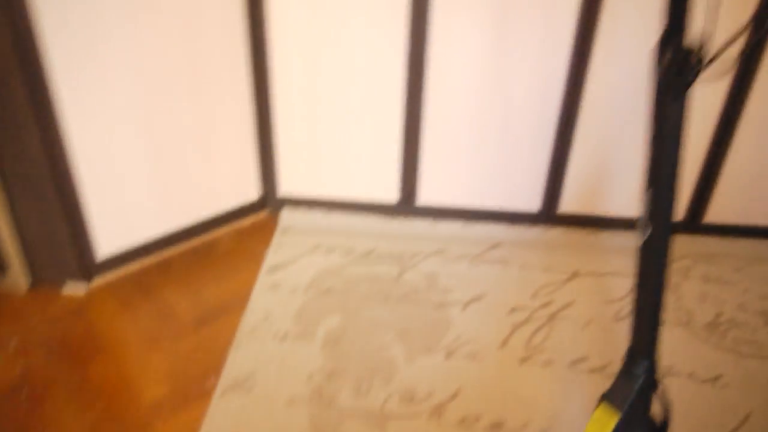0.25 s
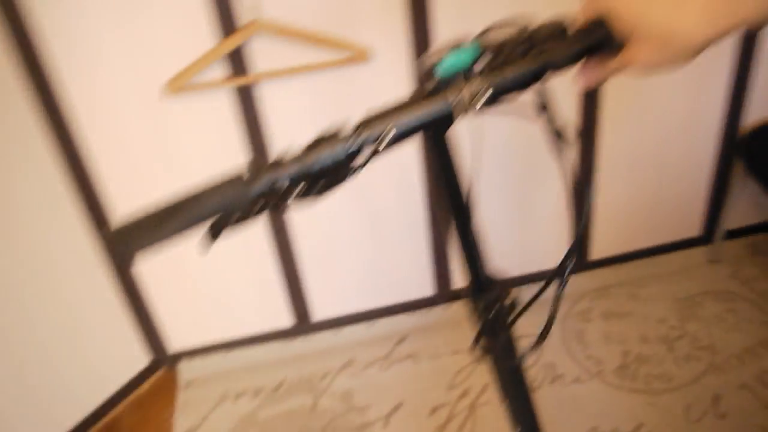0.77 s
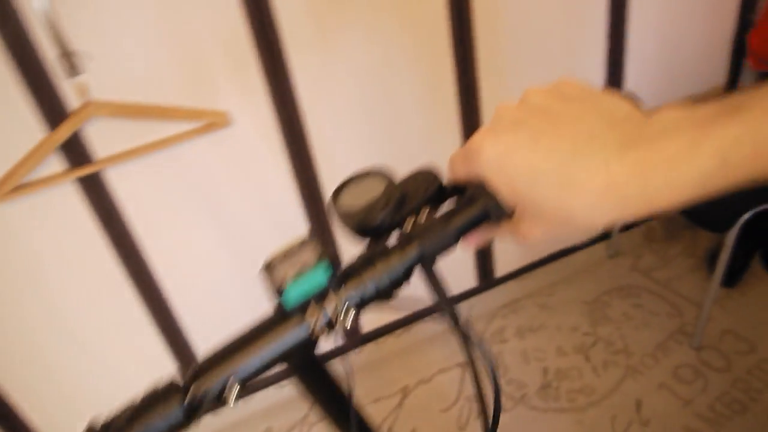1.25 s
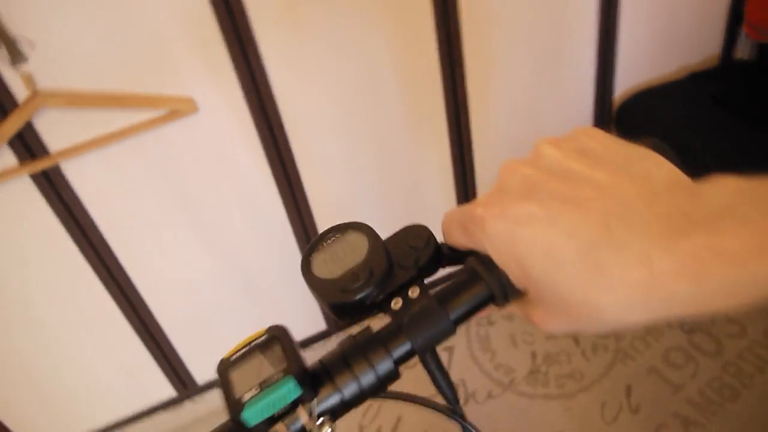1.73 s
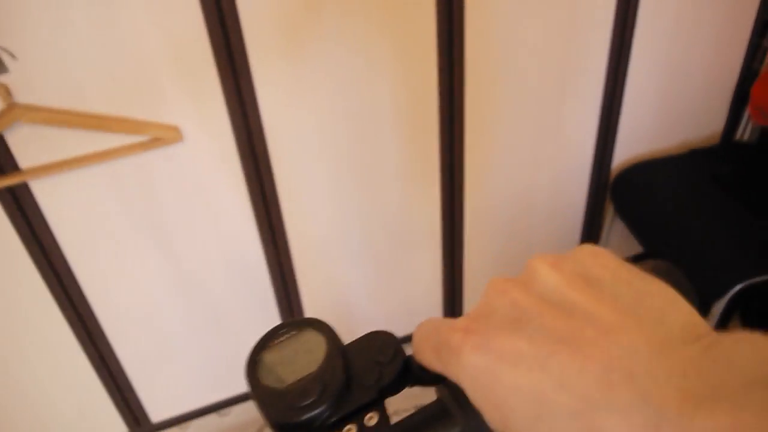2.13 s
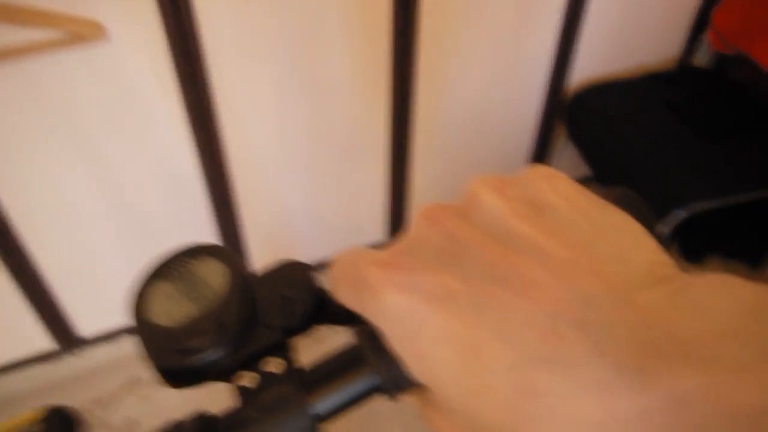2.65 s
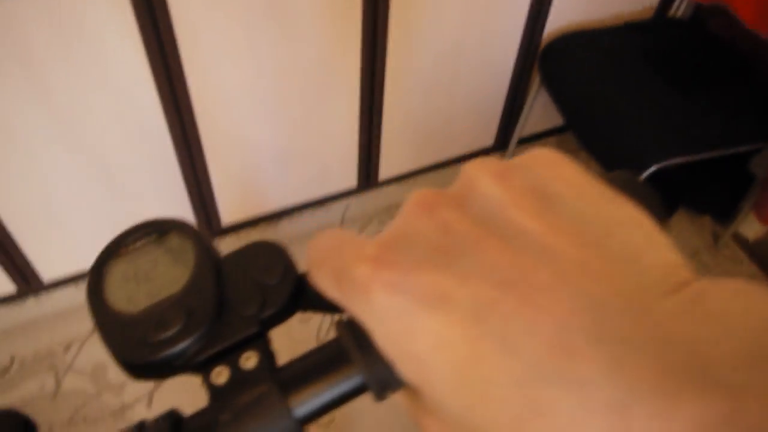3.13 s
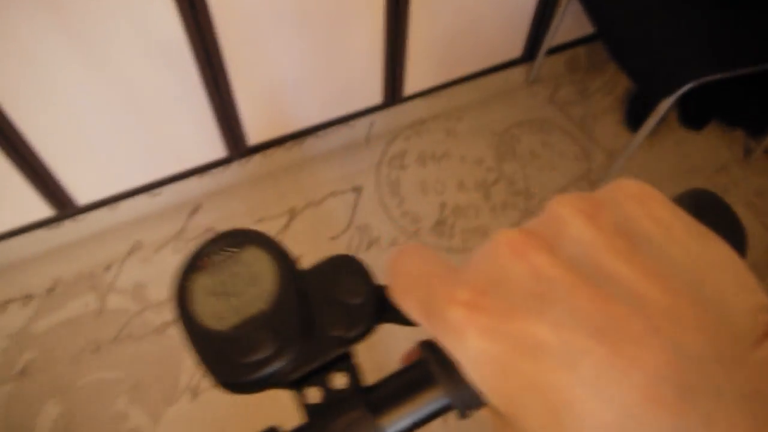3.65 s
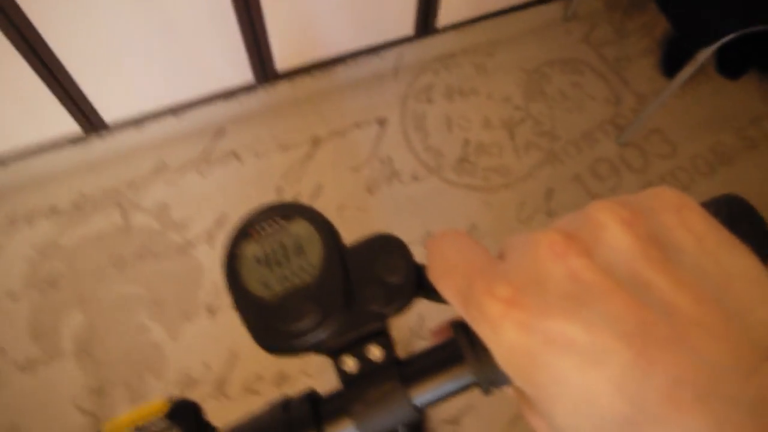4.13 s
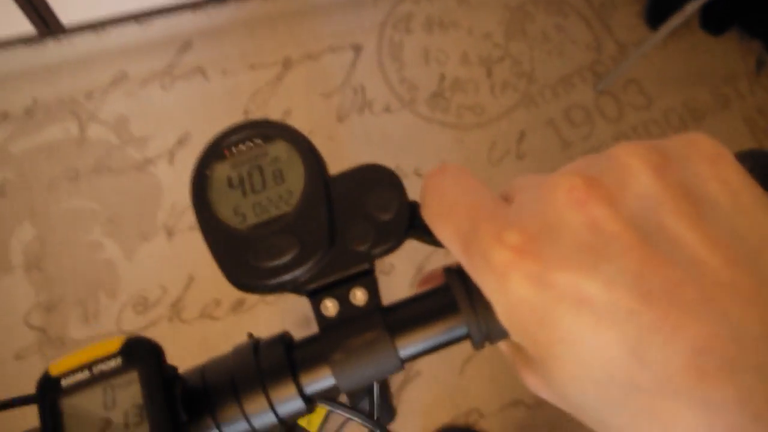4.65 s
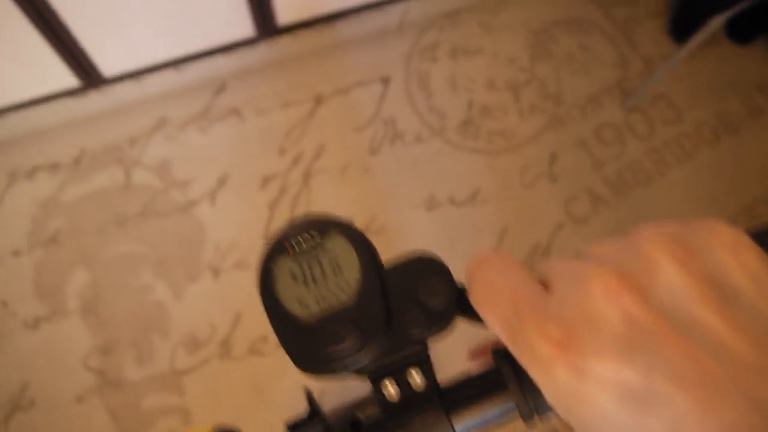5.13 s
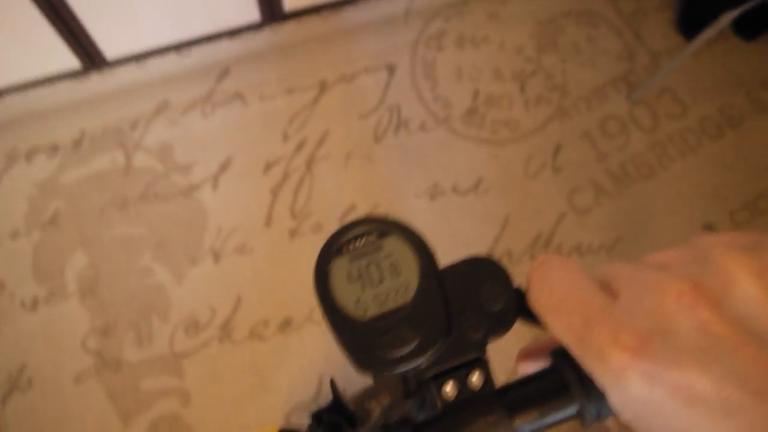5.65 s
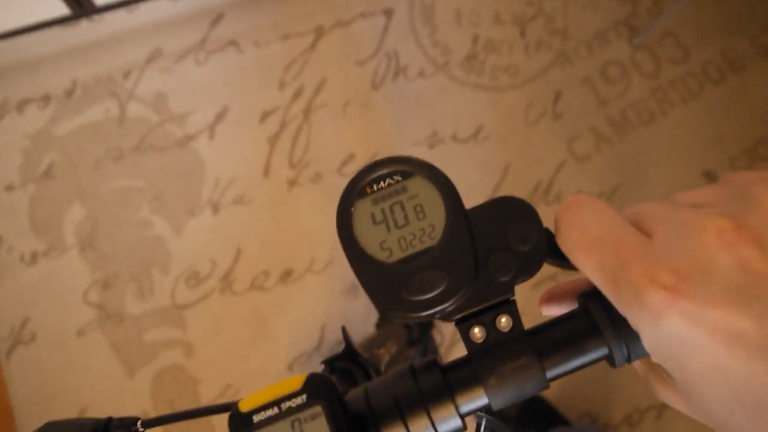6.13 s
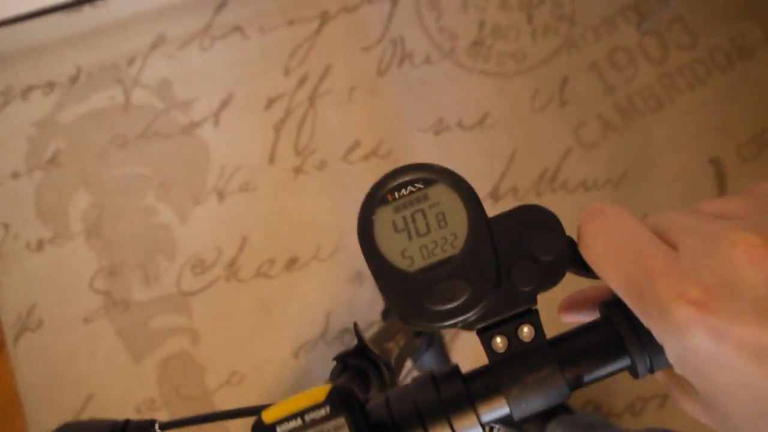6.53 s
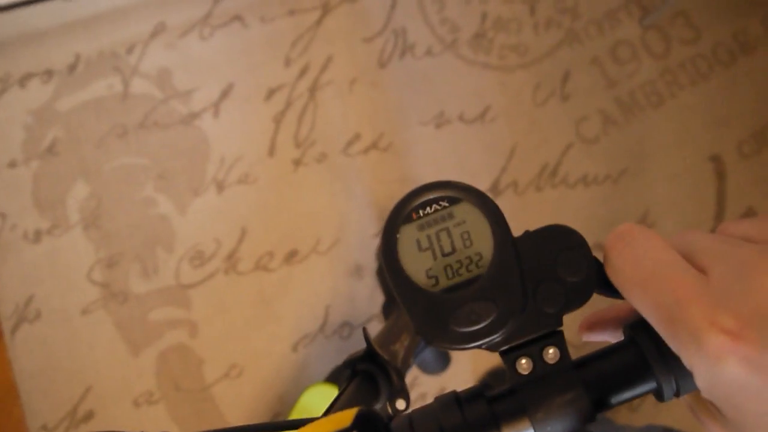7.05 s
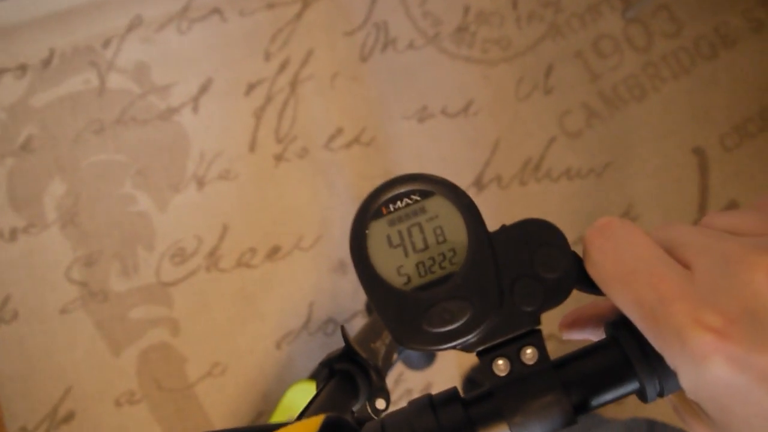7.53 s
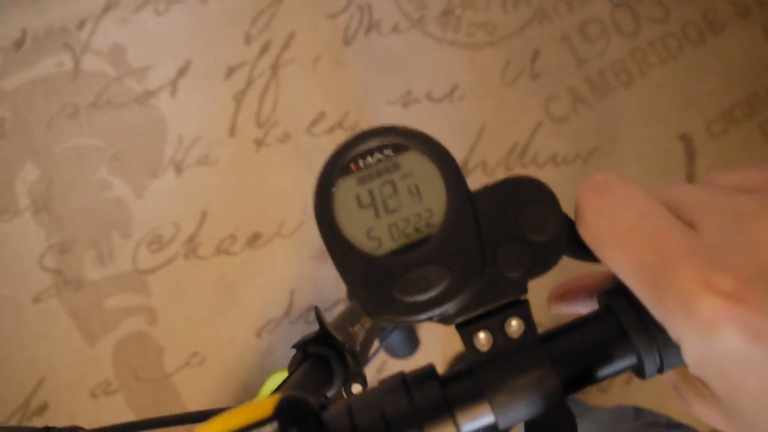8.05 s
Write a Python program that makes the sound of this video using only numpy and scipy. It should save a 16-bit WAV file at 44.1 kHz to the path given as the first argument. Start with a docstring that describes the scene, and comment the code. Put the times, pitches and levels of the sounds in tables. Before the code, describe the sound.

A small electric hub motor spins freely indoors, a steady mid-low hum fluttering rapidly under a thin, piercing treble whine and airy bearing rush.

```python
"""Free-spinning hub motor in a small room

The hub motor of a scooter spins free at full speed; a hand-held camera swings from wheel to handlebar.
Slots and magnets hum on multiples of the wheel's turn; the controller's switching whines in the treble.
Bearings and air rush through the hub's resonances, with thin tones of their own.
Early on cloth rustles and something scuffs near the camera's two microphones.
"""
import sys
import numpy as np
from scipy import signal
from scipy.fft import rfft, irfft, next_fast_len
from scipy.io import wavfile
from scipy.ndimage import uniform_filter1d

SR = 44100
rng = np.random.default_rng(int(sys.argv[2]) if len(sys.argv) > 2 else 0)


def waveform_to_disk(signal):
    """Save audio, clipped to [-1, 1], as 16-bit WAV at the path in sys.argv[1]."""
    frames = np.transpose(np.atleast_2d(signal))
    scaled = np.clip(frames, -1, 1) * 32767
    samples = np.round(scaled).astype(np.int16)
    wavfile.write(sys.argv[1], SR, samples)


N = 365588
TIME_S = np.arange(N) / SR
TURN_HZ = 13.8428  # turns of the wheel a second


def undb(db):
    """Gain of a level in dB."""
    return 10 ** (np.asarray(db) / 20)


def curves(table):
    """Columns of a (time [s], value, ..) table, joined by straight lines, one value a sample."""
    time_s, *columns = np.transpose(table)
    return [np.interp(TIME_S, time_s, column) for column in columns]


def walk(rate):
    """Random wander about zero, rate knots a second, joined smoothly; spread near 1."""
    step = int(SR / rate)
    knots = rng.standard_normal(N // step + 2)
    joined = np.interp(np.arange(N) / step, np.arange(len(knots)), knots)
    return 1.37 * uniform_filter1d(joined, step // 2)


def noise(gain):
    """Noise whose spectrum follows gain(Hz)."""
    size = next_fast_len(N)
    hz = np.arange(size // 2 + 1) * SR / size
    spectrum = rfft(rng.standard_normal(size)) * gain(hz + 1e-3)  # the offset avoids 0 Hz
    return irfft(spectrum, size)[:N]


def band(hz, width_hz):
    """Noise in one broad resonance, rms 1."""
    x = noise(lambda f: 1 / (1 + ((f - hz ** 2 / f) / width_hz) ** 2))
    return x / np.std(x)


def swell(start_s, length_s, rise):
    """An arch from nothing up to 1 and back; rise under 1 is quick to rise, slow to fade."""
    progress = np.clip((TIME_S - start_s) / length_s, 0, 1)
    return np.sin(np.pi * progress ** rise) ** 2


def tone(hz, db, waver_db=0., rate=1., start=None):
    """A sine of rms level db; given a waver, the changing path through the room shifts its strength and phase."""
    if start is None:
        start = rng.uniform(0, 2 * np.pi) + waver_db / 4 * walk(rate)
    strength = np.sqrt(2) * undb(db + waver_db * walk(rate))
    return strength * np.cos(2 * np.pi * hz * TIME_S + start)


# how fast the camera swings through the room's echo pattern:
# (time [s], fades [1/s], echo share of the power [0-1])
SWING = [(0, 60, .8), (.45, 50, 0.76), (1.0, 25, 0.86), (1.8, 23.4, 0), (8.29, 29.6, 0.02)]


def fading(hz):
    """A tone of rms near 1: direct sound plus echoes whose sum turns over as the camera swings."""
    rate, share = curves(SWING)
    travel = np.cumsum(rate) / SR
    share = np.clip(share, 0, 1)
    knots = rng.standard_normal((1000, 2)) @ [1, 1j] / np.sqrt(2)
    echoes = np.interp(travel, np.arange(len(knots)), knots)
    path = np.sqrt(1 - share) + np.sqrt(share) * echoes
    return np.sqrt(2) * np.real(path * np.exp(2j * np.pi * hz * TIME_S))


REPEAT = 0.46  # share of the pattern that returns one turn later


def echo_of_turn(hz, from_hz=0.):
    """Response of a pattern that partly repeats with every turn above from_hz; mean power 1."""
    share = REPEAT / (1 + (from_hz / hz) ** 4)
    return np.sqrt(1 - share ** 2) / (1 - share * np.exp(-2j * np.pi * hz / TURN_HZ))


# cloth close to the camera while it swings, level of the upper band at the arch's peak:
# (start [s], length [s], level [dB])
RUSTLES = [(.08, .66, -57.5), (.5, .66, -54.5)]


def cloth():
    """Cloth rubbing: two broad bands of noise, made grainy by fast random changes of level."""
    fabric = band(8500, 6000) + undb(-5.5) * band(4300, 2200.)
    rub = sum(undb(db) * swell(start_s, length_s, rise=.75) for start_s, length_s, db in RUSTLES)
    grain = undb(0.75 * walk(29.2) + 0.81 * walk(400.))
    return rub * grain * fabric


# scuffs and knocks near the camera, level at the arch's peak before graininess:
# (start [s], length [s], level [dB], centre [Hz], width [Hz])
HANDLING = [(0.122, 0.056, -46, 150, 100), (0.123, 0.081, -39.5, 684, 600), (0.229, 0.076, -43, 180, 80),
            (0.37, 0.14, -30, 810, 980), (1.254, .025, -60, 5000, 5000), (3.32, .012, -58.5, 5500, 3000)]


def handling():
    """Grainy scuffs and soft knocks near the camera: short arches of noise in one resonance each."""
    out = np.zeros(N)
    for start_s, length_s, db, hz, width_hz in HANDLING:
        grainy = undb(db + 2. * walk(300.))
        out = out + grainy * swell(start_s, length_s, rise=.7) * band(hz, width_hz)
    return out


# rush of bearings and air, before the resonances: (frequency [Hz], level [dB per Hz])
RUSH = [(15, -71.5), (40, -73), (120, -81), (300, -78), (900, -76.5), (2000, -88.5), (3200, -94.5),
        (5000, -101), (8000, -104), (11300, -105), (14350, -102), (14600, -114), (15600, -125)]
# hub and frame resonances that lift the rush: (centre [Hz], width [Hz], lift [dB])
HUB = [(364, 91, 9.5), (596, 55, 1), (860, 67, 1.5), (1250, 74, 10), (1633, 145, 7), (2430, 250, 3),
       (2706, 390, 9), (9400, 560, 9)]
# treble resonances of the casing: (centre [Hz], width [Hz], lift [dB])
CASING = [(12560, 550, 13), (13850, 900, 4)]


def rush():
    """Bearing and air noise through the hub's resonances, partly repeating each turn, flickering a little."""
    rush_hz, rush_db = np.transpose(RUSH)

    def gain(hz):
        db = np.interp(np.log(hz), np.log(rush_hz), rush_db)
        for centre_hz, width_hz, lift_db in [*HUB, *CASING]:
            db = db + lift_db / (1 + (2 * (hz - centre_hz) / width_hz) ** 2)
        return undb(db) * np.sqrt(SR / 2) * echo_of_turn(hz, from_hz=290.0)  # sqrt: level per Hz

    flicker = undb(0.69 * walk(14.))
    return noise(gain) * flicker


# tones off the turn's multiples, probably from the bearings, many in families one turn apart,
# levels before waver: (frequency [Hz], level [dB])
OTHER_TONES = [(277, -62), (448, -60), (485.5, -60), (598, -66), (612, -61), (625.3, -59), (651.3, -59),
               (797, -64), (840, -60), (992, -67), (1182, -68), (1237, -65), (1336, -67), (1353, -68),
               (1560, -68), (1635, -67), (1651, -66), (2377, -73), (2445, -72), (2459, -67), (2554, -72),
               (2608, -72), (2622, -71), (3737, -77)]
# a bearing whine near 2.7 kHz with its side tones: (frequency [Hz], level [dB re BEARING_DB])
BEARING = [(2676, -10), (2689, -12), (2704, -9), (2717, -11), (2758, -13), (2785, -12), (2799, -11)]
# reference level of that whine, before waver: (time [s], level [dB])
BEARING_DB = [(0, -53), (1.2, -58), (5.5, -56.5), (7.5, -53)]
# a lone tone that comes up late, before waver: (time [s], level [dB])
LONE = [(3, -68), (4, -63), (5, -62), (6.2, -55), (7.2, -61)]


def bearings():
    """Thin tones that waver on their own; the whine near 2.7 kHz also wavers as a group."""
    thin = sum(tone(hz, db, waver_db=2.5, rate=2.492) for hz, db in OTHER_TONES)
    group = undb(curves(BEARING_DB)[0] + 2.0 * walk(5.9))
    bearing_whine = group * sum(tone(hz, db, waver_db=2.5, rate=4.) for hz, db in BEARING)
    lone = tone(908.5, curves(LONE)[0], waver_db=3.5, rate=6.5)
    return thin + bearing_whine + lone


# switching tones, some thirty turns apart, before the bounce is added:
# (frequency [Hz], level [dB], wander [dB])
WHINE = [(12209., -59, 2.5), (12623.8, -43.3, .3), (13454.3, -67.5, 3.5), (13869.8, -61, 3)]
# faint switching products, before wander: (frequency [Hz], level [dB])
FAINT = [(8472, -83), (9095, -77), (9344, -80), (9468, -79), (9717, -74), (10964, -80), (11379, -84),
         (11793, -80), (12002, -80), (12333, -78), (12376, -78), (12458, -73), (12540, -65), (12707, -71),
         (12790, -74), (12914, -75), (13039.5, -69), (14068, -80), (14286, -79)]
# the strong ones also arrive off a surface close to the camera; their waves are short,
# so the hand's wobble fades them: (time [s], extra path [mm])
BOUNCE = [(1.1, 145), (1.7, 148.4), (1.9, 155), (2.12, 140), (2.19, 158), (2.32, 142.3), (2.61, 156),
          (2.74, 149.7), (3.21, 144), (3.46, 154), (3.86, 149.6), (4.2, 150.2), (4.36, 144), (4.66, 124),
          (4.82, 144), (5.03, 145.5), (5.19, 156.7), (5.51, 148), (5.61, 152), (5.98, 137), (6.39, 144),
          (6.87, 153.5), (7.43, 144.6), (8.05, 155.8), (8.29, 150.5)]
BOUNCE_SHARE = 0.71  # strength of the bounce beside the direct sound
SOUND_MM_S = 343000


def whine():
    """Controller switching tones, the strong ones shaken by the uneven magnets passing once a turn."""
    out = sum(undb(db + 3.6 * walk(2.49)) * fading(hz) for hz, db in FAINT)
    late_s = curves(BOUNCE)[0] / SOUND_MM_S
    for hz, db, wander_db in WHINE:
        direct_and_bounce = np.abs(1 + BOUNCE_SHARE * np.exp(-2j * np.pi * hz * late_s))
        shake = noise(lambda f: echo_of_turn(f) ** 2 * f / (f + 8.7) / (1 + (f / 42.0) ** 1.6))
        shaken = 1 + 0.15 * shake / np.std(shake)
        out = out + undb(db + wander_db * walk(9.9)) * direct_and_bounce * fading(hz) * shaken
    return out


START_RAD = 2.31  # wheel angle at the start: sets when the hum throbs
FLUTTER_DB, FLUTTER_RAD = -9, -0.31  # 54th multiple re the 55th [dB]; wheel angle of their beat [rad]
# main hum, the 27th multiple, as the camera moves through the room's standing waves:
# (time [s], level [dB])
HUM = [(0.0, -27.5), (0.02, -26), (0.25, -27), (0.6, -37), (0.71, -30.5), (1.18, -23.5), (1.5, -21),
       (3.25, -24), (3.92, -22), (4.69, -24.5), (5.24, -22.5), (5.89, -25), (8.29, -27.5)]
# strong multiples; the 90th and 120th before their throb:
# (time [s], 26th [dB], 30th [dB], 55th [dB], 90th [dB], 120th [dB])
OVERTONES = [(0.1, -43, -58, -53.5, -57, -60), (.33, -48, -42.5, -43.5, -42, -57),
             (.6, -56, -44.5, -45, -49, -54), (1.05, -46, -49, -44.5, -52.5, -59.5),
             (1.35, -45, -72, -50, -54, -52.5), (1.7, -47, -74.5, -47, -56.5, -63.5),
             (2.2, -42.5, -52, -44, -49.5, -61.5), (3.6, -46, -53.5, -43, -49.5, -57),
             (4.7, -40.5, -48, -43, -52, -63), (5.7, -44, -47, -43, -55.5, -63),
             (7.1, -40.5, -45.5, -42.5, -62, -57.5), (8.29, -42.5, -45.5, -43.5, -48.5, -68)]
# once-a-turn swell of the 90th and 120th: (time [s], depth [0-1], wheel angle [rad])
THROB = [(1.6, .1, -2), (2.1, 1, -2), (3.7, 1, -1.95), (4.3, .3, -.6), (5.5, .45, .2), (8.29, .3, .2)]
# upper neighbours of the hum that grow as the camera settles; a minus sign flattens the beat's crest
# and sharpens its dip: (multiple, sign, level at the start [dB], rise [dB/s])
GROWING = [(28, 1, -60, .8), (29, -1, -57, 1.15)]
# weaker multiples of the turn, before waver: (multiple, level [dB])
ORDER_TONES = [(25, -60), (31, -55), (33, -64), (35, -60), (36, -65), (45, -65), (47, -63), (53, -57),
               (60, -54), (61, -66), (69, -68), (73, -67), (87, -67), (88, -67), (92, -62), (107, -71),
               (108, -68), (109, -72), (112, -72), (136, -70), (158, -78), (161, -76), (180, -69),
               (210, -76), (225, -80)]


def hum():
    """Magnetic pull between slots and magnets: tones locked to the turn; neighbours beat once a turn."""
    def locked(multiple, db, lead_rad=0.):
        return tone(multiple * TURN_HZ, db, start=multiple * START_RAD + lead_rad)

    db26, db30, db55, db90, db120 = curves(OVERTONES)
    main = locked(27, curves(HUM)[0]) + locked(26, db26) + locked(30, db30)
    growing = sum(sign * locked(k, db + rise * TIME_S) for k, sign, db, rise in GROWING)
    flutter = locked(55, db55) + locked(54, db55 + FLUTTER_DB, START_RAD + FLUTTER_RAD)
    depth, angle = curves(THROB)
    throb = 1 + depth * np.cos(2 * np.pi * TURN_HZ * TIME_S + angle)
    throbbing = throb * (locked(90, db90) + tone(120 * TURN_HZ, db120, waver_db=1.5, rate=3.))
    weak = sum(tone(k * TURN_HZ, db, waver_db=2.0, rate=1.462) for k, db in ORDER_TONES)
    return main + growing + flutter + throbbing + weak


def scene():
    """All sources, from the background to the motor's hum, reach both microphones alike."""
    sound = cloth() + handling() + rush() + bearings() + whine() + hum()
    return np.array([sound, sound])


def record(dry):
    """The left channel loses bass; a faint hiss and rumble are opposite in the two channels; the top is cut."""
    bass = signal.lfilter(*signal.butter(1, 128, fs=SR), dry[0])
    lost = 0.024 * dry[0] + bass
    left = dry[0] - signal.filtfilt(*signal.butter(2, 1440, fs=SR), lost)  # well above 1440 Hz both agree
    hiss = noise(lambda f: 1 / (1 + (3230 / f) ** 16) / (1 + (f / 11700) ** 40))
    rumble = band(60, 100.)
    apart = undb(-70.5) * hiss / np.std(hiss) + undb(-83) * rumble
    both = np.array([left + apart, dry[1] - apart])
    top_cut = signal.ellip(8, .2, 70, 15600, fs=SR, output="sos")
    return signal.sosfilt(top_cut, both)


dry = scene()
out = record(dry)
waveform_to_disk(out)
```